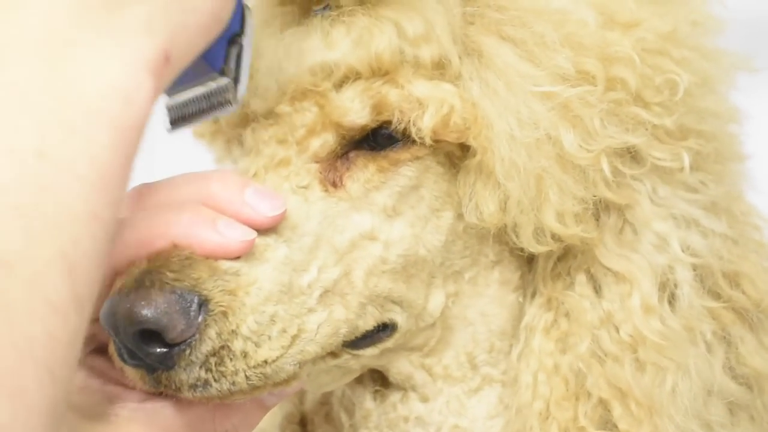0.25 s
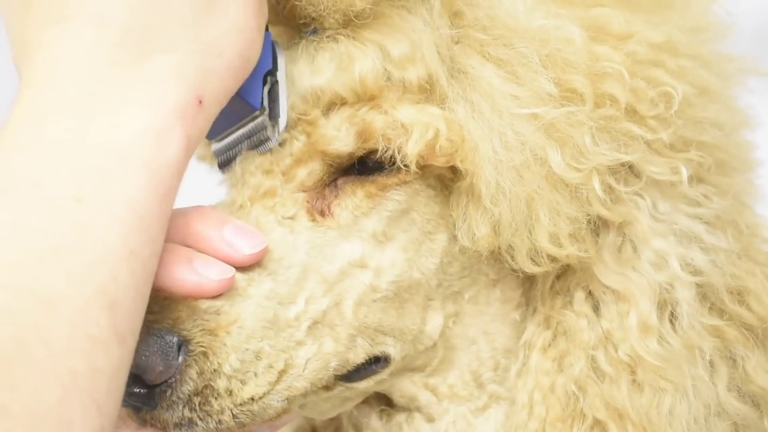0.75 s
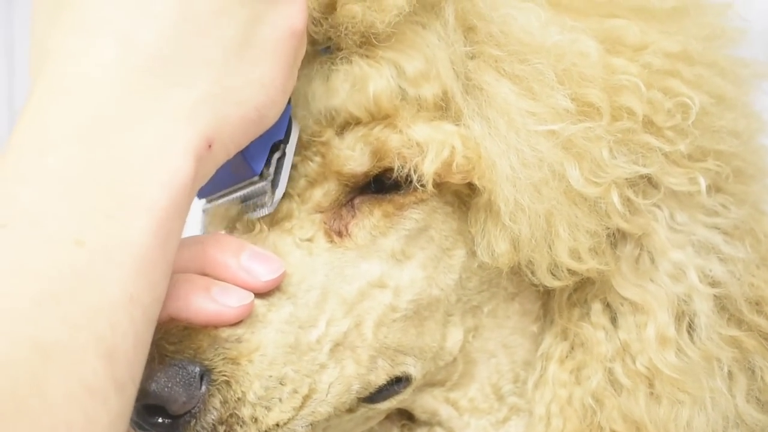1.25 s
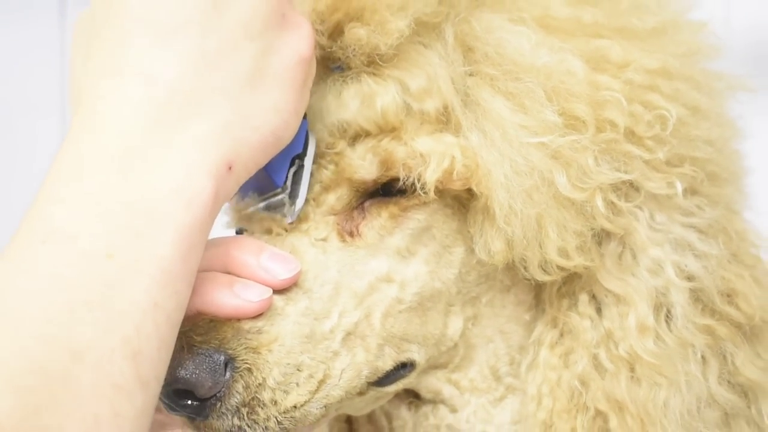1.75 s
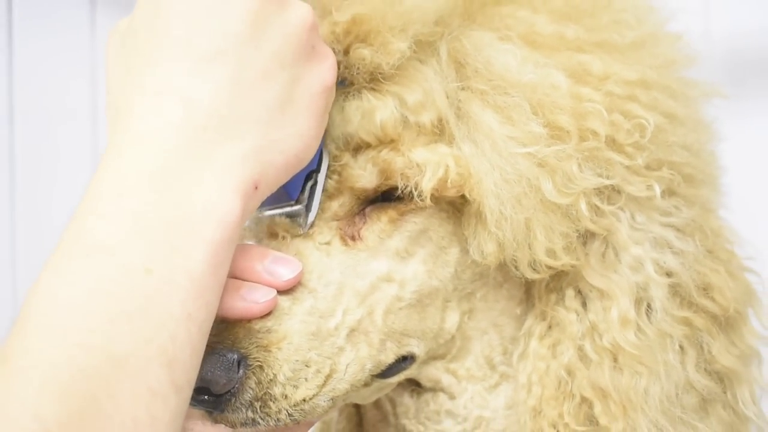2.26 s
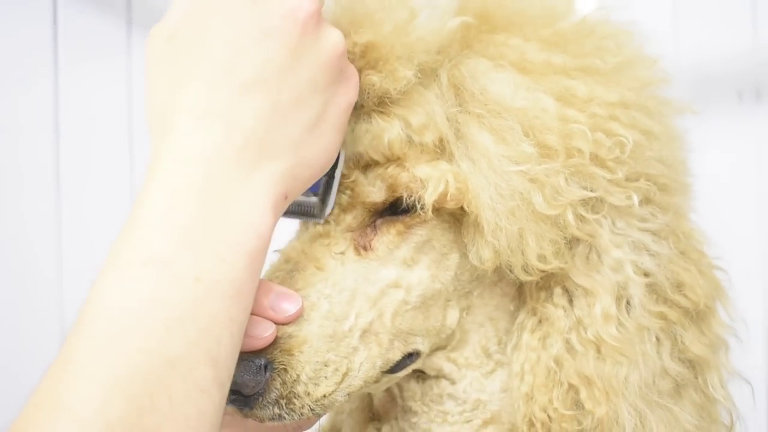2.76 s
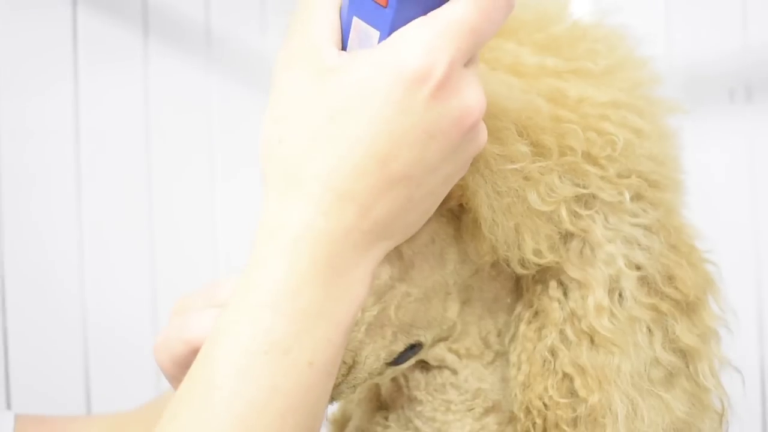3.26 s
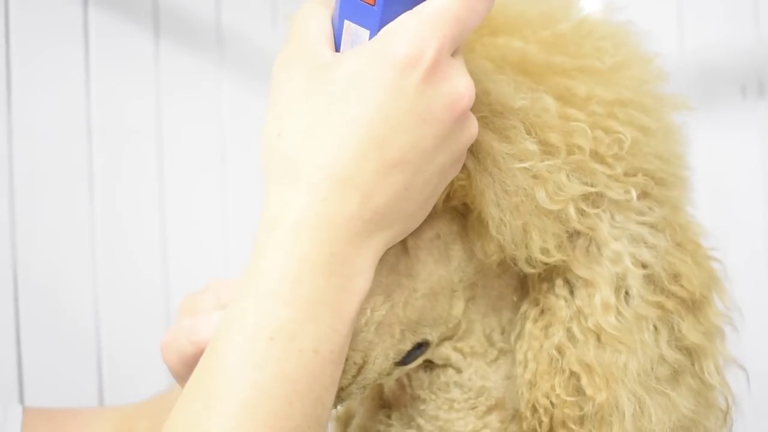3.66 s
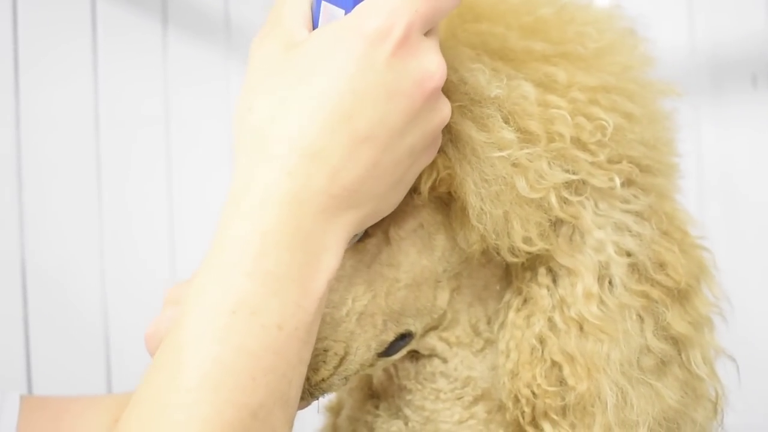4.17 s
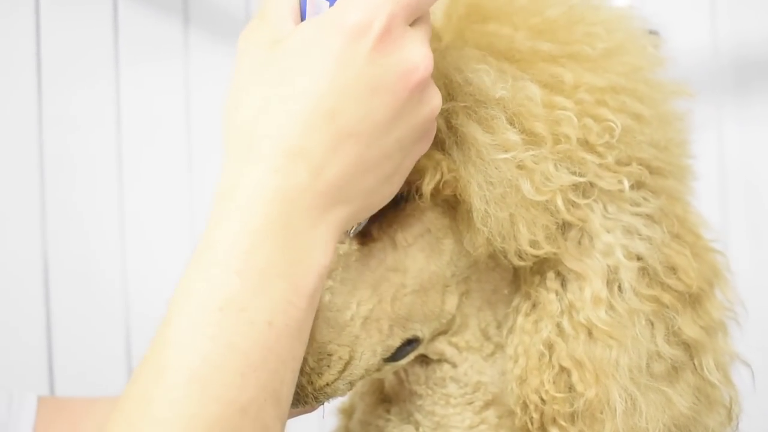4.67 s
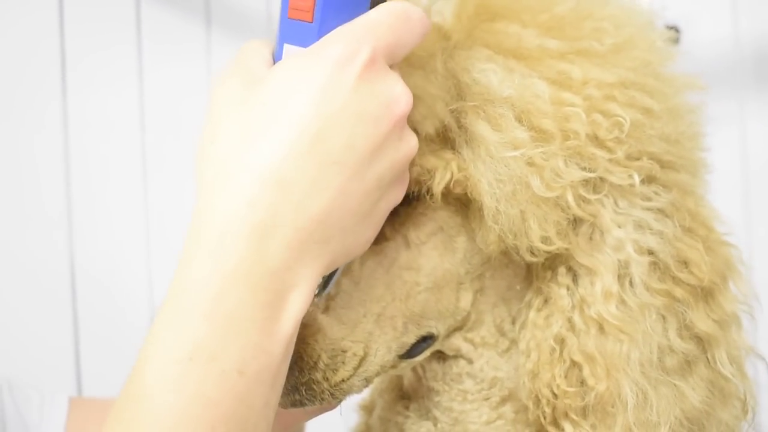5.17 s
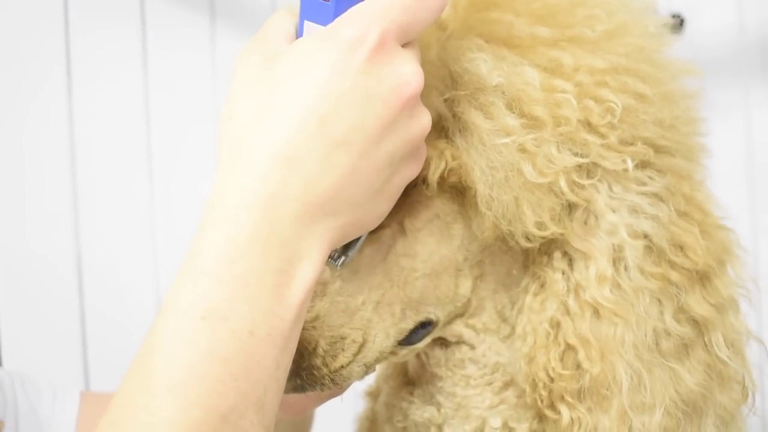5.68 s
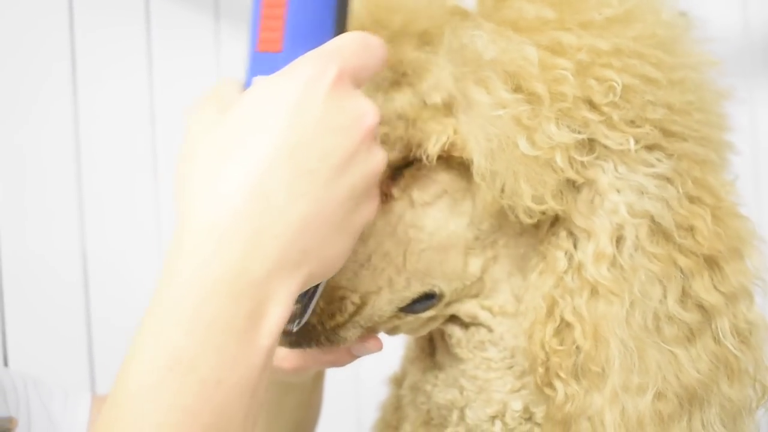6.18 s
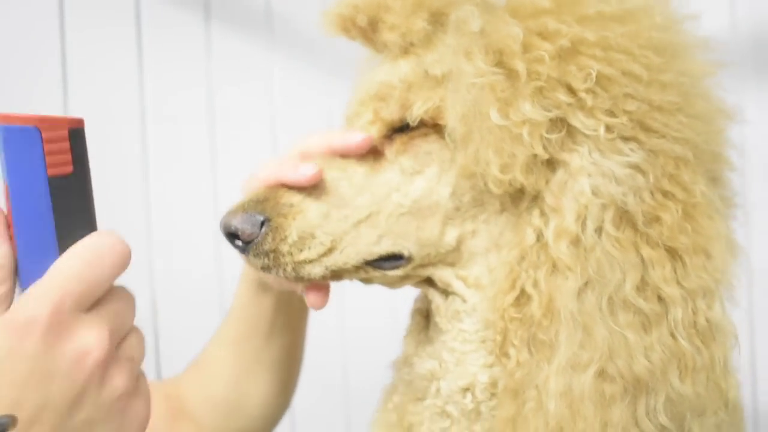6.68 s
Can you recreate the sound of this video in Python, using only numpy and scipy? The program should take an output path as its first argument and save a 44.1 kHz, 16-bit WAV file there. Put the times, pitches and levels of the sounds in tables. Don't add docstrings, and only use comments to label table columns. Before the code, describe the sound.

Electric clippers buzz steadily up close with a raspy, ticking edge in a small hard room, one early bump, then abruptly switch off.

```python
import sys
import numpy as np
from scipy import signal
from scipy.fft import rfft, irfft, next_fast_len
from scipy.io import wavfile
from scipy.ndimage import uniform_filter1d

SR = 44100
rng = np.random.default_rng(int(sys.argv[2]) if len(sys.argv) > 2 else 0)


def gain_from_db(level_db):
    decades = np.asarray(level_db, float) / 20
    return 10 ** decades


def log_audio(samples):
    frames = np.atleast_2d(samples).T
    limited = np.clip(frames, -1, 1)
    pcm = np.round(limited * 32767).astype(np.int16)
    wavfile.write(sys.argv[1], SR, pcm)


N = 305416

TEETH, PINION = 42, 11
SWITCH_S, OFF_S = 6.7, 6.765
# time in seconds, peak in dB.
EARLY_SNAPS = [(0.0338, -30), (0.0583, -19), (0.083, -17), (0.1805, -11), (0.205, -10), (0.2907, -13),
               (0.3263, -8), (0.3521, -16), (0.4748, -18), (0.5838, -12), (0.5965, -13), (0.7185, -22),
               (0.7307, -24), (0.7428, -20), (0.8405, -27), (0.8649, -19), (0.9867, -17), (1.0111, -12),
               (1.133, -15), (1.1573, -16), (1.255, -21), (1.2795, -14), (1.4017, -15), (1.6457, -24),
               (1.6701, -16), (1.694, -17), (1.792, -17), (1.816, -9), (1.914, -14), (1.9629, -14),
               (2.0607, -15), (2.0852, -10), (2.1829, -29), (2.2069, -19), (2.2313, -17), (2.3291, -22),
               (2.353, -12), (2.4513, -26), (2.4753, -14), (2.4997, -16), (2.597, -13), (2.6214, -8),
               (2.7192, -24), (2.7437, -16), (2.7681, -7), (2.8654, -12), (2.8898, -7), (2.988, -7),
               (3.0118, -6), (3.0355, -11), (3.134, -4), (3.157, -2)]
# time in seconds, peak in dB.
LATE_SNAPS = [(3.2547, -19), (3.2792, -15), (3.3034, -6), (3.4009, -6), (3.4253, -3), (3.5226, -17),
              (3.547, -8), (3.571, -7), (3.6683, -18), (3.693, -4), (3.766, -29), (3.7905, -16),
              (3.8394, -5), (3.9127, -25), (3.9367, -12), (3.9616, -8), (4.0828, -22), (4.1082, -6),
              (4.205, -9), (4.2304, -8), (4.2539, -24), (4.3273, -30), (4.3517, -24), (4.3762, -8),
              (4.4734, -15), (4.4979, -9), (4.6203, -8), (4.644, -6.5), (4.7413, -13), (4.766, -6),
              (4.8635, -30), (4.8875, -25), (4.9117, -8), (5.0092, -12), (5.0337, -10), (5.1798, -8),
              (5.2771, -13), (5.3016, -4.5), (5.424, -7), (5.4477, -18), (5.545, -12), (5.5694, -7),
              (5.6907, -14), (5.7151, -17), (5.8124, -19), (5.8368, -13), (5.983, -15), (6.0683, -24),
              (6.0804, -15), (6.1047, -11), (6.226, -8), (6.2511, -7), (6.3477, -19), (6.3723, -8.5),
              (6.4087, -19), (6.6156, -17.5), (6.64, -12), (6.664, -23)]


def rms_one(x):
    return x / np.sqrt(np.mean(x ** 2) + 1e-20)


def in_time(rows):
    s, *columns = np.transpose(rows)
    return [np.interp(np.arange(N) / SR, s, c) for c in columns]


def colour(x, points):
    size = 2 * next_fast_len(N // 2 + 999)
    hz = np.arange(size // 2 + 1) * SR / size + 1
    point_hz, point_db = np.transpose(points)
    db = np.interp(np.log(hz), np.log(point_hz), point_db)
    cepstrum = irfft(np.log(gain_from_db(db)), size)
    cepstrum[1:size // 2] *= 2
    response = np.exp(rfft(cepstrum[:size // 2 + 1], size))
    return rms_one(irfft(rfft(x, size) * response, size)[:N])


def wander(turns, count):
    r = np.exp(-1 / turns)
    steps = rng.standard_normal((count, 400))
    return signal.lfilter([np.sqrt(1 - r * r)], [1, -r], steps)[:, 100:]


def hits(turn, share, sizes, jitter=0.0012):
    due = np.arange(300) - 1 + share + jitter * rng.standard_normal(300)
    keep = (due > turn[0]) & (due < turn[-1])
    at = np.interp(due[keep], turn, np.arange(N))
    out = np.zeros(N + 1)
    np.add.at(out, at.astype(int), sizes[keep] * (1 - at % 1))
    np.add.at(out, at.astype(int) + 1, sizes[keep] * (at % 1))
    return out[:N]


def ring(x, hz, width_hz):
    r, w = np.exp(-np.pi * width_hz / SR), 2 * np.pi * hz / SR
    return signal.lfilter([0, np.sin(w)], [1, -2 * r * np.cos(w), r * r], x + 1e-18)


def burst(clicks, ms, rough=0.24):
    r = np.exp(-1000 / (ms * SR))
    envelope = signal.lfilter([0, 1], [1, -r], clicks)
    return clicks + rough * envelope * rng.standard_normal(N)


def glints(rows):
    t, edge_s = np.arange(N) / SR, 0.05
    return sum(db * np.clip(np.minimum(t - s, s + length - t) / edge_s, 0, 1) for s, length, db in rows)


def heard(db, near, tilt, bare):
    # time in seconds, nearness in dB, blade tilt from -1 to 1,
    # blade bare of fur from 0 to 1.
    pose = [(0, -0.5, -1.8, 0.97), (.22, 0, 1.1, 1), (.36, -0.5, -0.84, 0.74), (.85, -3.5, -1.1, 0.5),
            (1.3, -1.5, -1.14, 0.7), (2.2, -2, -1, 0.35), (2.65, -0.5, -0.81, 0.42),
            (2.98, -1, -0.36, 0.54), (3.15, 1, 0.5, 1), (3.6, -1, 0.072, 0.86), (3.95, 1, 0.5, 0.48),
            (4.4, 0.5, 0.36, 0.55), (4.75, 0, 0.5, 0.33), (5.05, -1, 0.51, 0.4), (5.35, 0.5, 1.2, 0.6),
            (5.75, -2.5, -0.16, 0.78), (6.25, -0.5, 1.3, 0.66), (6.4, -2, -0.42, 1)]
    s, nearness_db, tilted, bared = np.transpose(pose)
    t = np.arange(N) / SR
    droop_db = 102 * np.clip(t - SWITCH_S, 0, OFF_S - SWITCH_S)
    return db + np.interp(t, s, near * nearness_db + tilt * tilted + bare * bared) - droop_db


def rumble():
    # middle in seconds, half width in seconds, gain in dB.
    swells = [
        (.35, 0.11, 8.5),
        (1.25, 0.051, 6),
        (1.82, 0.27, 5.7),
        (2.3, 0.24, 3),
        (4.2, 0.35, 7.4),
        (5.0, 0.26, 2.8),
        (6.5, 0.47, 3.5),
    ]
    # frequency in Hz, level in dB per Hz.
    floor_spectrum = [(25, -16), (60, -9.5), (100, -7.5), (160, -3), (200, -5), (300, 3), (450, -3.5),
                      (2000, -33), (8000, -51), (16000, -47)]
    t = np.arange(N) / SR
    swell_db = sum(db * np.exp(-((t - s) / width) ** 2) for s, width, db in swells)
    return gain_from_db(-57.5 + swell_db) * colour(rng.standard_normal(N), floor_spectrum)


def room(x):
    t60_s, wall_hz, shift_s = 0.45, 6100, 2.3
    t, out = np.arange(round(.6 * SR)) / SR, 0
    dull = np.exp(-2 * np.pi * wall_hz / SR)
    for place in range(3):
        white = rng.standard_normal(len(t))
        low = signal.lfilter([1 - dull], [1, -dull], white)
        tail = low * gain_from_db(-60 * t / t60_s) + (white - low) * gain_from_db(-60 * t / (0.38 * t60_s))
        tail = (t > .004) * tail
        phase = np.pi * (np.arange(N) / SR / shift_s + place / 3)
        there = np.sqrt(2 / 3) * np.abs(np.cos(phase))
        out = out + signal.oaconvolve(x * there, tail / np.sqrt(np.sum(tail ** 2)))[:N]
    return out


def bump():
    # time in seconds, peak in dB.
    bump_event = [
        (0.2108, -13.5),
    ]
    # frequency in Hz, level in dB, decay time T60 in seconds.
    table_modes = [(101, -30, 0.87), (148.5, -5, 0.91), (235.6, 11, 0.52), (257, 4, 0.57), (290, 10, 0.15),
                   (358, 9, 0.17), (412, 3.5, 0.56), (556, 1, 0.26), (720, 0, 0.38), (920, -26, 0.81),
                   (1130, -34, 10), (1000, -13, 0.66), (1100, -16, 0.8), (1260, 3, 0.11)]
    legs_hz, legs_db, legs_t60_s = 83.4, -37.5, 1.8
    (s, peak_db), = bump_event
    blow, crack = np.zeros(N), np.zeros(N)
    for late_s, db in ((.001, -10), (.011, -0.5), (.02, -13)):
        blow[round((s + late_s) * SR)] = gain_from_db(db)
    crack[round(s * SR)] = 1
    to_width = 3 * np.log(10) / np.pi
    rings = 0
    for k, (hz, db, t60) in enumerate(table_modes):
        rings = rings + (-1) ** k * gain_from_db(db) * ring(blow, hz, to_width / (0.41 * t60))
    push = 9.9 * signal.lfilter([.001], [1, -.999], blow)
    sway = gain_from_db(legs_db) * ring(push, legs_hz, to_width / legs_t60_s)
    slap = signal.lfilter([.3, -.3], [1, -1.66, .672], burst(crack, ms=14.0, rough=.8))
    snap_band = signal.butter(2, [300, 5500], "band", fs=SR, output="sos")
    snap = signal.sosfilt(snap_band, burst(crack, ms=1.0, rough=0.83))
    top = gain_from_db(peak_db - 13.5) * rings + gain_from_db(peak_db) * sway
    return top + gain_from_db(-8.0) * slap + gain_from_db(-8) * snap


def crank():
    # start in seconds, speed in turns per second.
    crank_speed = [(0, 40.954), (.15, 40.828), (.45, 40.938), (.75, 41.057), (1.05, 40.971), (2.25, 41.012),
                   (2.85, 41.057), (3.15, 41.085), (3.75, 40.980), (4.35, 41.005), (4.65, 41.090),
                   (4.95, 41.058), (5.55, 41.110)]
    crank_hz, rundown_s, start_turn = 41.05, 0.22, -.4462
    t = np.arange(N) / SR
    late = np.maximum(t - SWITCH_S, 0)
    lost_s = late - rundown_s * (1 - np.exp(-late / rundown_s))
    s, speed = np.transpose(crank_speed)
    driven = np.cumsum(speed[np.searchsorted(s, t, "right") - 1]) / SR
    return start_turn + driven - crank_hz * lost_s


def casing(turn):
    # crank order, shaft order, level in dB.
    casing_lines = [(7, 0, -68), (8, 0, -66), (9, 0, -65), (10, 0, -61), (13, 0, -56), (2, 3, -60),
                    (10, 1, -61), (15, 0, -55), (17, 0, -57), (19, 0, -58), (22, 0, -57), (25, 0, -56),
                    (26, 0, -54), (28, 0, -52), (30, 0, -56), (31, 0, -54)]
    out = 0
    for k, m, db in casing_lines:
        out = out + gain_from_db(db) * np.sin(2 * np.pi * turn * (k + m * TEETH / PINION) + k * k)
    return out


def motor(turn):
    # level in dB, share of nearness,
    # dB per tilt, dB per bareness.
    mesh_heard = [
        (-50.5, 0.11, 2, 5.5),
        (-51, .1, 2, 14.7),
        (-46.5, 0.29, 0, 7.5),
    ]
    # start in seconds, length in seconds, gain in dB.
    commutator_glints = [
        (-.1, 0.26, 16),
        (2.7, 0.51, 8.5),
        (3.76, 0.25, 17),
        (4.2, 0.5, 12),
        (4.83, 0.5, 10),
        (5.38, 1, 12.5),
        (6.68, .25, 12),
    ]
    # start in seconds, length in seconds, gain in dB.
    mesh_glints = [
        [(1.74, 0.22, 3.2), (3.3, 0.38, 5.2), (6.4, 0.2, 12)],
        [(-.1, 0.34, 7.6), (3.05, 0.2, 5.5), (3.38, 0.26, 4.5), (5.13, 0.24, 7.3), (5.4, 0.24, 4.9),
         (6.12, 0.12, 3.8), (6.53, .19, 5.2)],
        [(.55, 0.31, 5.4), (2.55, 0.28, 8.9), (3.5, 0.7, 6.1), (4.15, 0.49, 6.4), (5.12, 0.15, 6.4),
         (5.78, .45, 4.6)],
    ]
    shaft = 2 * np.pi * turn * TEETH / PINION
    wobble = np.interp(turn + 1, np.arange(300), wander(turns=6.3, count=1)[0])
    flicker = [2.5 * np.interp(turn + 1, np.arange(300), w) for w in wander(turns=2.1, count=4)]
    commutator_db = heard(-47, near=0, tilt=1, bare=-2) + glints(commutator_glints) + flicker[3]
    mesh_db = [heard(*part) + glints(rows) + f for part, rows, f in zip(mesh_heard, mesh_glints, flicker)]
    hum_db = -53 + glints([(6.33, .8, -9)])
    out = gain_from_db(commutator_db) * np.sin(9 * shaft + .3 * wobble)
    out += gain_from_db(hum_db) * np.sin(3 * shaft)
    for multiple, db in enumerate(mesh_db + [mesh_db[2] - 9], start=1):
        out += gain_from_db(db) * np.sin(multiple * (PINION * shaft + .5 * wobble))
    return out


def snaps():
    s, db = np.transpose(EARLY_SNAPS + LATE_SNAPS)
    clicks = np.zeros(N)
    clicks[((s + .001) * SR).astype(int)] = gain_from_db(db - 4.5)
    band = signal.butter(3, [7000, 13000], "band", fs=SR, output="sos")
    return 3.0 * signal.sosfilt(band, burst(clicks, ms=.35, rough=.3))


def blades(turn):
    # frequency in Hz, level in dB per Hz.
    slide_spectrum = [(200, -24), (380, -14), (490, -22), (700, -12), (1400, -5), (2600, -1), (5150, -2),
                      (6100, -8.5), (7000, -5.5), (7700, -7.5), (8600, -6.5), (10000, -11), (13600, -20),
                      (16000, -26)]
    # frequency in Hz, level in dB per Hz.
    clack_spectrum = [(300, -46), (600, -3.5), (1200, -23.5), (2500, 0), (3600, 7), (4400, 5), (5200, 4),
                      (6000, -6), (7000, -1), (8500, -9), (11000, -10.5), (16000, -25)]
    # frequency in Hz, level in dB per Hz.
    tick_spectrum = [(2000, -83), (5000, 16.5), (8000, 7.5), (10500, 13.5), (13000, 13.5), (15000, 7),
                     (17000, -20)]
    # angle in turns, level in dB.
    tick_angles = [(.02, -6), (.06, -8), (.12, -9), (.2, -7), (.24, -10), (.31, -13)]
    # start in seconds, length in seconds, gain in dB.
    tick_glints = [
        (2.86, 0.2, 0),
        (3.12, 0.061, -5),
        (6.21, 0.068, 3),
        (6.44, .18, -11),
        (6.68, .4, -17),
    ]
    slide_db = heard(-29.5, near=0.51, tilt=-0.15, bare=3.5)
    tick_db = heard(-45.5, near=0, tilt=-2, bare=0) + glints(tick_glints)

    stroke = gain_from_db(1.3 * np.cos(4 * np.pi * (turn - .1)))
    slide = gain_from_db(slide_db - 3.0) * colour(stroke * rng.standard_normal(N), slide_spectrum)

    uneven = gain_from_db(1.5 * wander(turns=.6, count=10))
    clacks = hits(turn, -0.00833, uneven[0]) + 0.88 * hits(turn, .492, uneven[1])
    clacks += .45 * hits(turn, .22, uneven[8]) + .35 * hits(turn, .72, uneven[9])
    clack = gain_from_db(slide_db - 3) * colour(burst(clacks, ms=0.78, rough=0.47), clack_spectrum)

    s, snap_db = np.transpose(EARLY_SNAPS + LATE_SNAPS)
    aligned = np.full(300, gain_from_db(-10.0))
    due = turn[(s * SR).astype(int)]
    outward = np.abs(due - np.round(due)) < .25
    aligned[np.round(due[outward]).astype(int) + 1] = gain_from_db(0.5 * snap_db[outward] + 12)
    ticks = sum(hits(turn, share, gain_from_db(db) * aligned * u) for (share, db), u in zip(tick_angles, uneven[2:]))
    sizzle = .11 * burst(hits(turn, .01, aligned), ms=11)
    tick = gain_from_db(tick_db + 5.0) * colour(burst(ticks, ms=0.18, rough=0.97) + sizzle, tick_spectrum)
    return slide + clack + tick


def hollow(x):
    # start in seconds, length in seconds, first and last frequency in Hz,
    # level in dB.
    hollow_sweeps = [
        (0.11, 0.25, 2760, 2370, -29.5),
        (6.22, 0.11, 2700, 2800, -30.5),
        (6.4, 0.18, 3000, 2350, -29.5),
        (6.6, 0.16, 3140, 2700, -29.5),
        (6.3, 0.32, 2000, 1600, -42.5),
        (6.12, 0.13, 2000, 2100, -35),
    ]
    out, r = np.zeros(N), np.exp(-np.pi * 300 / SR)
    for s, length, from_hz, to_hz, db in hollow_sweeps:
        start, size, state = round(s * SR), round(length * SR), np.zeros(2)
        band = np.zeros(size)
        for i in range(0, size, 128):
            hz = from_hz + (to_hz - from_hz) * i / size
            poles = [1, -2 * r * np.cos(2 * np.pi * hz / SR), r * r]
            block = x[start + i:start + min(i + 128, size)]
            band[i:i + 128], state = signal.lfilter([1, 0, -1], poles, block, zi=state)
        swell = np.sin(np.pi * np.arange(size) / size) ** 1.1
        out[start:start + size] += gain_from_db(db) * rms_one(band) * swell
    return out


def cup(x):
    # time in seconds, frequency in Hz, lift in dB.
    hand_shape = [(0, 2340, 2), (.3, 2510, 3.5), (.55, 2680, 4), (1.3, 2520, 2), (2.2, 2700, 1.5),
                  (2.65, 2450, 5), (3.2, 2480, 7), (3.75, 2340, 5), (4.1, 2400, 4), (4.45, 2170, 5),
                  (4.75, 2340, 3.5), (5.15, 2170, 3), (5.45, 2440, 2), (6.15, 2250, 4), (6.28, 2660, 5.5),
                  (6.46, 3130, 5), (6.64, 3360, 7.5), (6.75, 3000, -1.5)]
    hz, lift_db = in_time(hand_shape)
    band, state, r = np.zeros(N), np.zeros(2), np.exp(-np.pi * 270 / SR)
    for i in range(0, N, 256):
        poles = [1, -2 * r * np.cos(2 * np.pi * hz[i] / SR), r * r]
        band[i:i + 256], state = signal.lfilter([1, 0, -1], poles, x[i:i + 256], zi=state)
    return x + (gain_from_db(lift_db) - 1) * (1 - r * r) / 2 * band


def buzz(turn):
    # frequency in Hz, width in Hz, peak level in dB, strength on the return stroke.
    housing = [(1580, 40, -3, 0.72), (1635, 31, 2.5, 0.43), (1920, 86, -11, 0.3), (1353, 27, -16, 0.93),
               (1120, 29, -38, 0.36), (1827, 60, -0.5, 0.85)]
    # frequency in Hz, width in Hz, peak level in dB, strength on the return stroke.
    low_blade = [(2056, 63, 8.5, 0.58), (2068, 59, 0, 1), (2205, 42, 4.5, 1), (2480, 85, 1.5, -0.3)]
    # frequency in Hz, width in Hz, peak level in dB, strength on the return stroke.
    mid_blade = [(2333, 89, -2.5, -0.66), (2444, 56, -3.5, -1.5), (2521, 79, 3, -0.6),
                 (2657, 61, -4.5, -2.7), (2162, 90, -5, -2)]
    # frequency in Hz, width in Hz, peak level in dB, strength on the return stroke.
    high_blade = [(2900, 140, -1.5, -0.4), (3000, 102, -2, -1.6), (2996, 63, 1, 1), (3193, 130, -5.5, 0.51),
                  (3425, 164, -4, 0.54), (3864, 280, -4, -1.02)]
    # swing in dB, crest in turns.
    stroke_swells = [
        (1.5, 0.07),
        (3, 0.1),
        (5, 0.24),
        (1, 0.1),
    ]
    levels_db = [heard(-43.5, near=-1, tilt=1, bare=2), heard(-33, near=0.7, tilt=-6, bare=-4),
                 heard(-30.5, near=1.5, tilt=1.6, bare=-3), heard(-33.5, near=0.85, tilt=0.5, bare=1.5)]
    knocks = [0, .08, .2, .29]
    felt_dbs = [(0, -12, -7, -14), (0, -9, -6, -14), (-12, -3, 0, -4), (0, -12, -2, -12)]

    even = np.ones(300)
    out_stroke = np.array([hits(turn, share, even) for share in knocks])
    back_stroke = np.array([hits(turn, share + .5, even) for share in knocks])
    at = np.flatnonzero(out_stroke.any(axis=0) | back_stroke.any(axis=0))
    turn_of = np.clip(turn[at].astype(int) + 1, 0, 299)
    scuff, out = rng.standard_normal(N), 0
    groups = (housing, low_blade, mid_blade, high_blade)
    for modes, level_db, felt_db, (swing_db, crest) in zip(groups, levels_db, felt_dbs, stroke_swells):
        group = 0
        for hz, width_hz, db, back in modes:
            share_db = np.array(felt_db)[:, None] + 3.54 * wander(turns=9.0, count=4)
            felt = rng.choice([-1, 1], (4, 1)) * gain_from_db(share_db)
            force = 0.01 * scuff
            both_strokes = out_stroke[:, at] + back * back_stroke[:, at]
            force[at] += np.sum(felt[:, turn_of] * both_strokes, axis=0)
            group = group + gain_from_db(db) * width_hz * ring(force, hz, width_hz)
        steady = group / np.sqrt(uniform_filter1d(group ** 2, size=SR // 6))
        swell_db = swing_db * np.cos(4 * np.pi * (turn - crest))
        out = out + gain_from_db(level_db + 0.58 + swell_db) * steady
    return signal.sosfilt(signal.butter(2, 550, "high", fs=SR, output="sos"), out)


def scene():
    turn = crank()
    coast_s = 0.028
    power = np.exp(-np.maximum(np.arange(N) / SR - OFF_S, 0) / coast_s)
    edge = blades(turn)
    body_cut = signal.butter(5, 560, "high", fs=SR, output="sos")
    body = signal.sosfilt(body_cut, cup(buzz(turn) + edge))
    near = power * (body + hollow(edge) + motor(turn) + snaps()) + bump()
    return (near + gain_from_db(-6.5) * room(near) + power * casing(turn) + rumble())[None]


def top_cut(x):
    return signal.sosfilt(signal.butter(12, 15860, fs=SR, output="sos"), x)


def record(dry):
    thin = signal.sosfilt(signal.butter(2, 50, "high", fs=SR, output="sos"), dry)
    return top_cut(thin)


dry = scene()
out = record(dry)
log_audio(out)
```